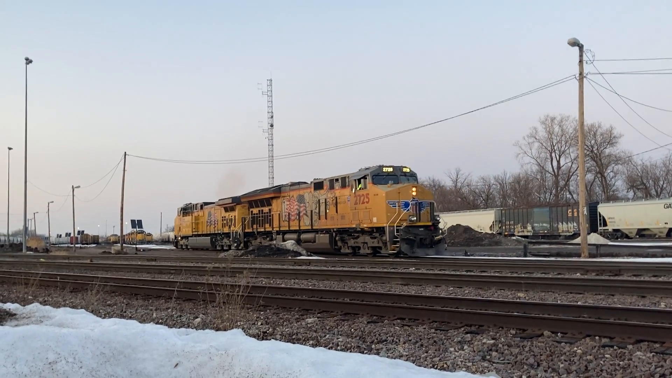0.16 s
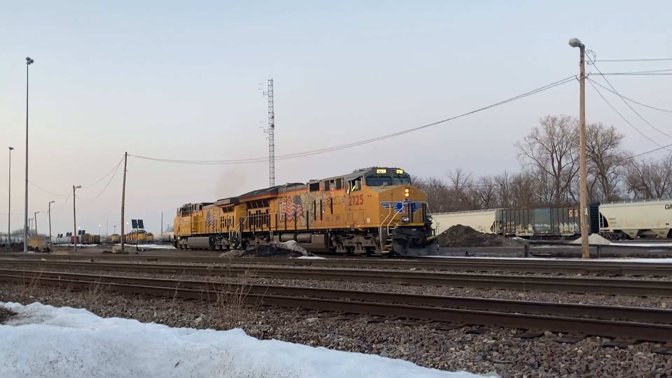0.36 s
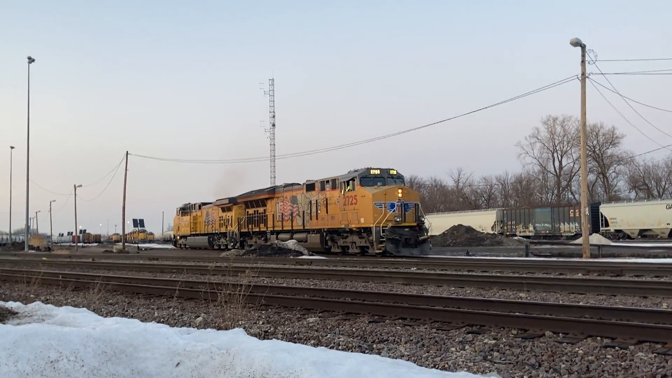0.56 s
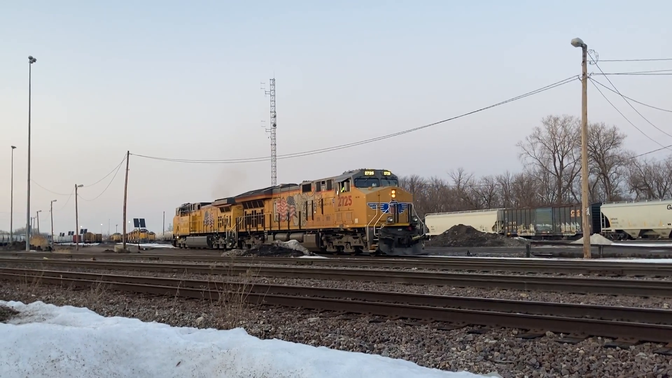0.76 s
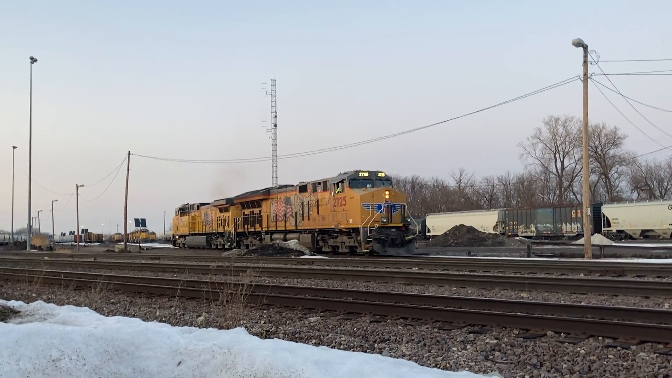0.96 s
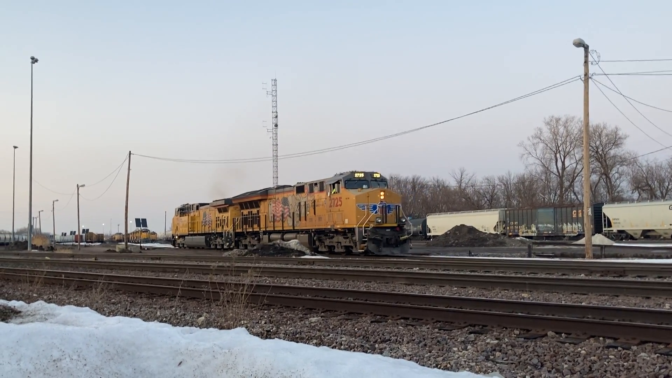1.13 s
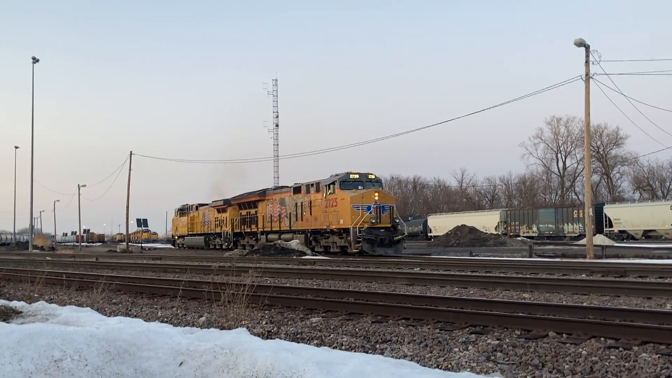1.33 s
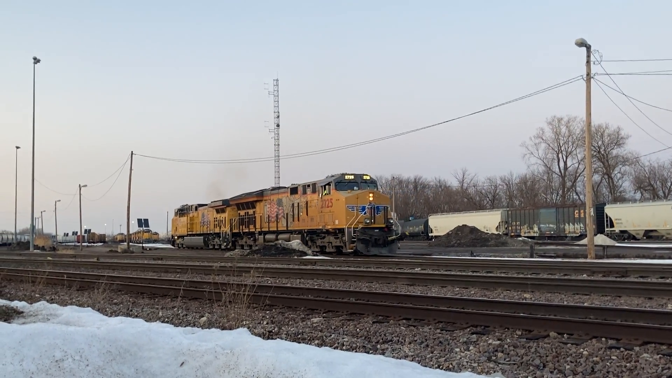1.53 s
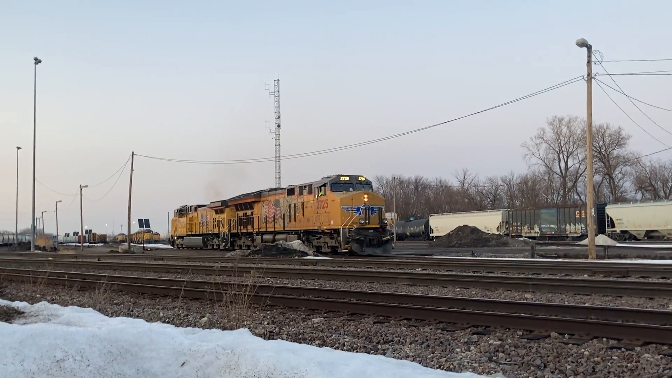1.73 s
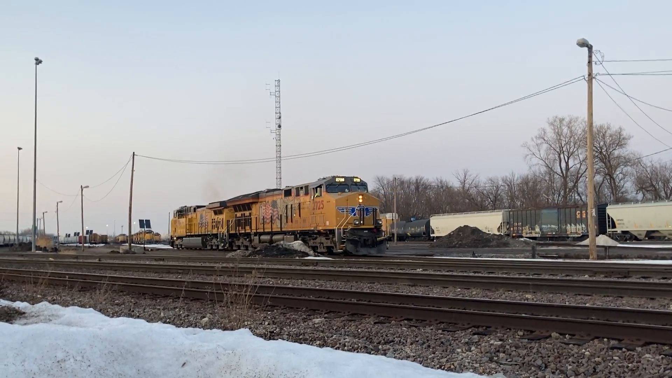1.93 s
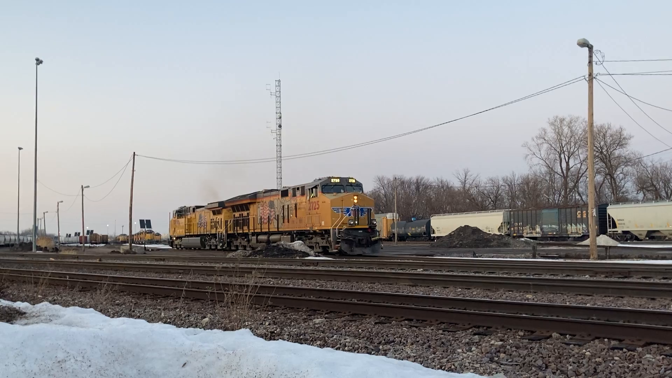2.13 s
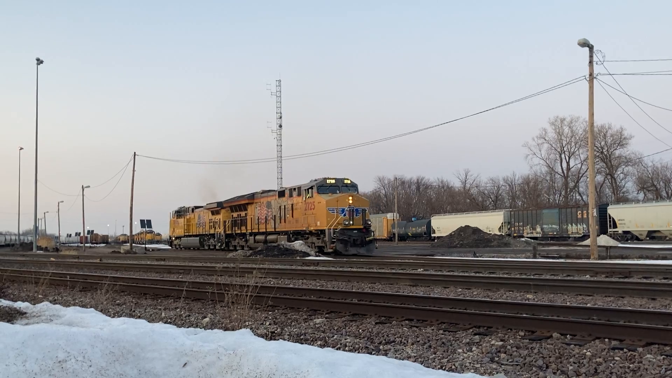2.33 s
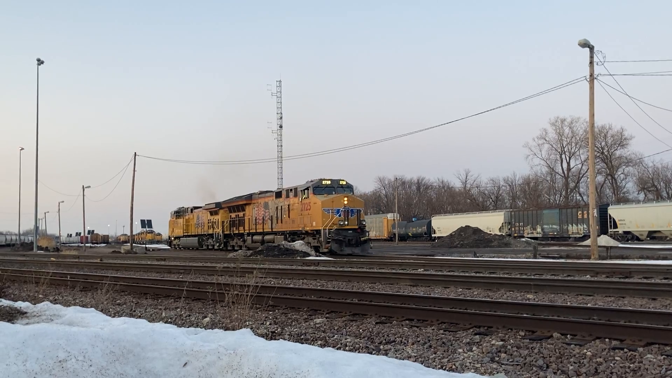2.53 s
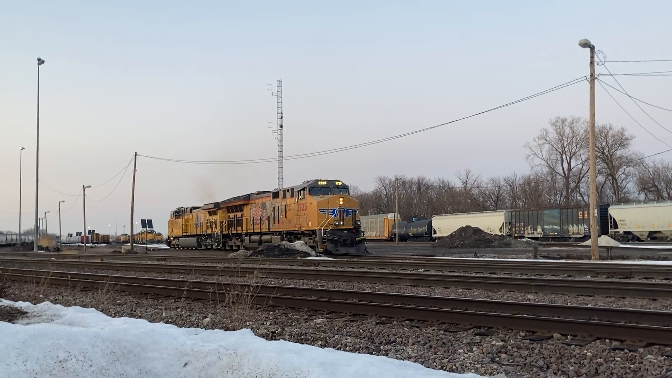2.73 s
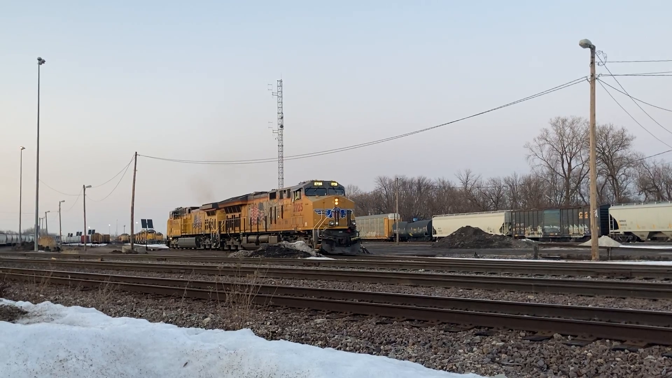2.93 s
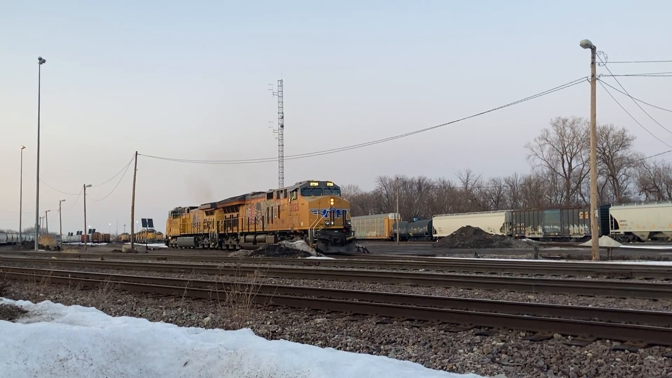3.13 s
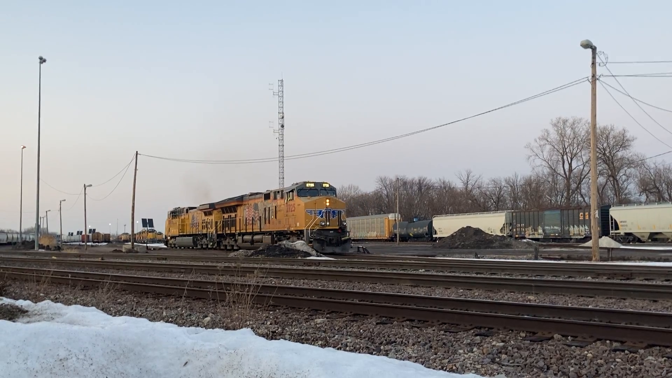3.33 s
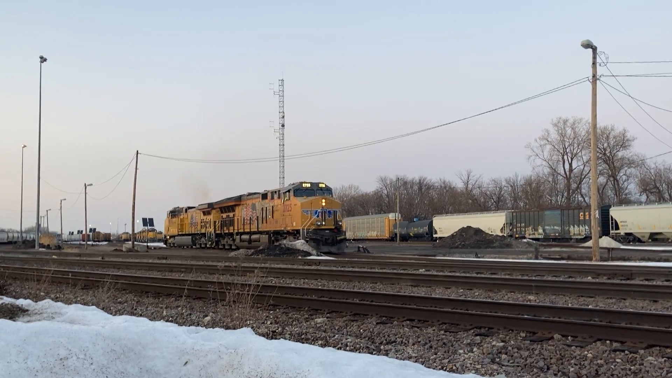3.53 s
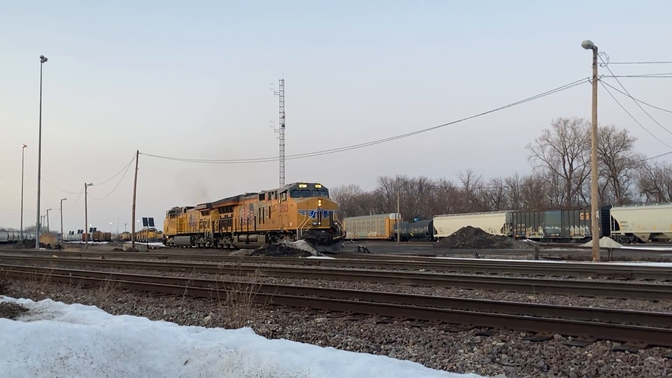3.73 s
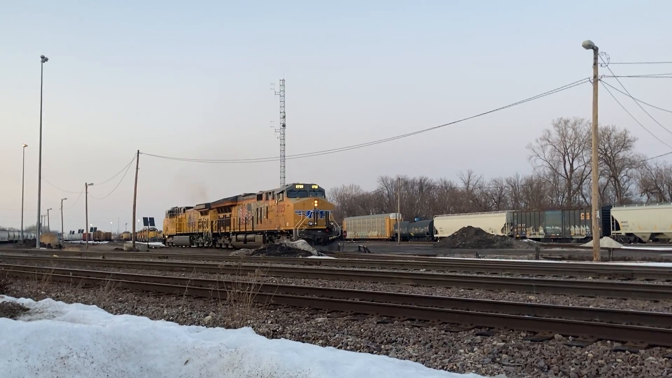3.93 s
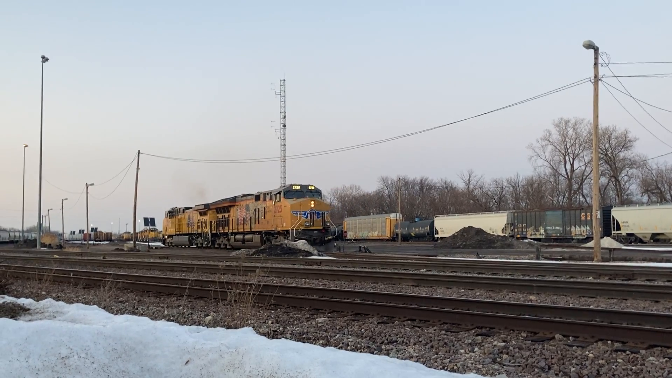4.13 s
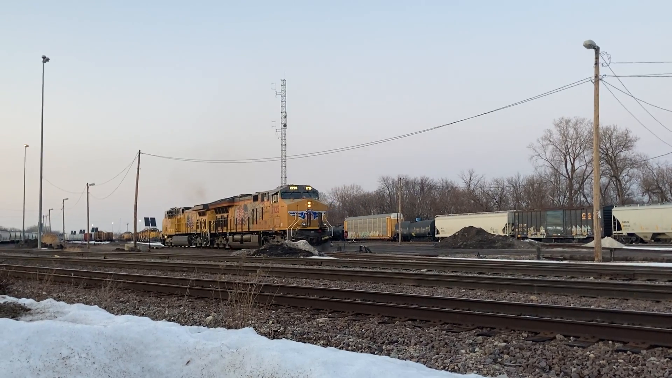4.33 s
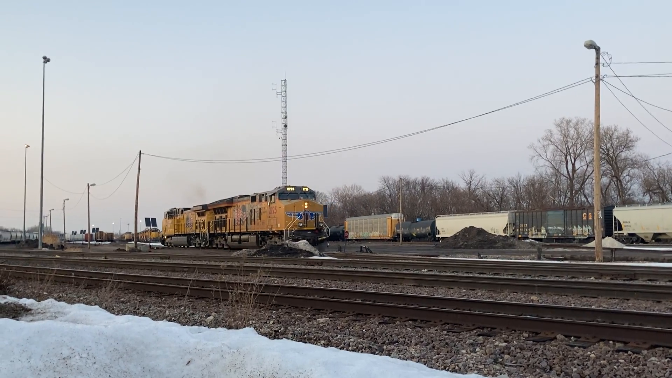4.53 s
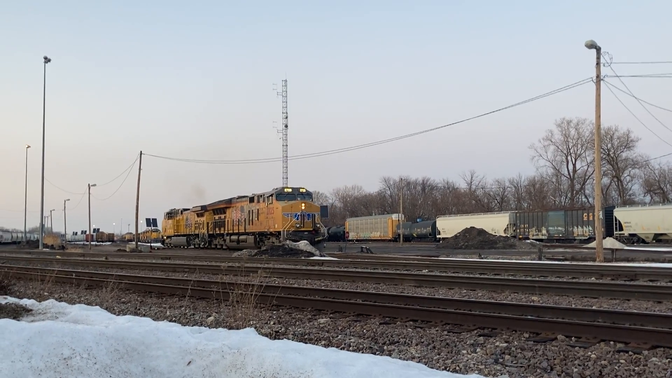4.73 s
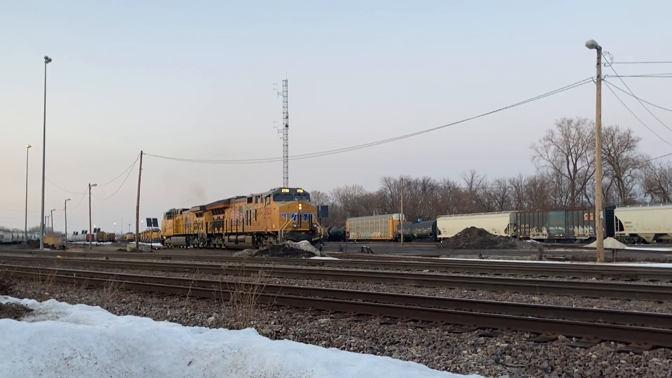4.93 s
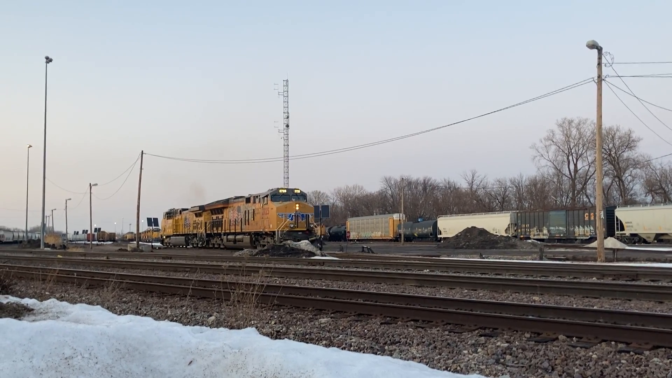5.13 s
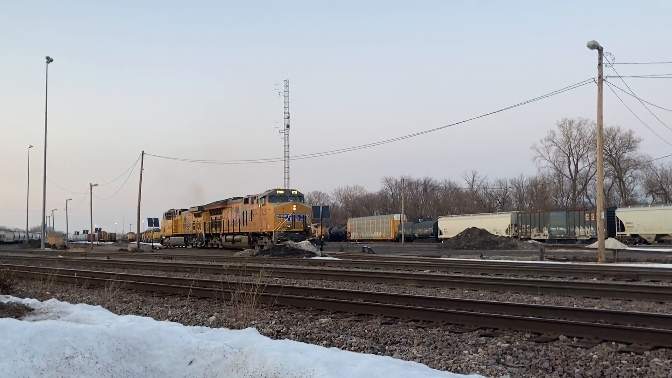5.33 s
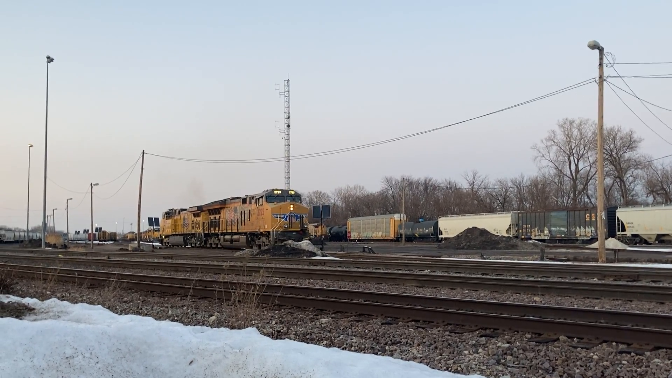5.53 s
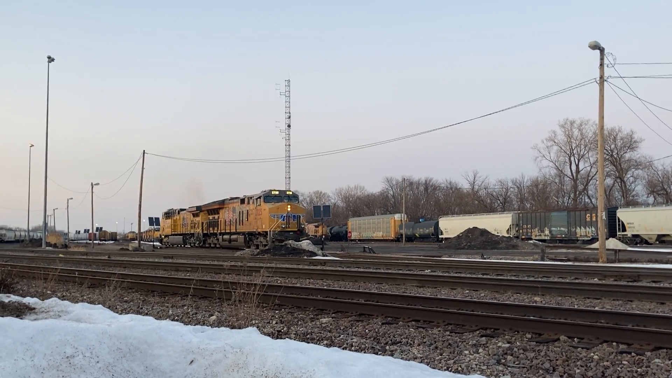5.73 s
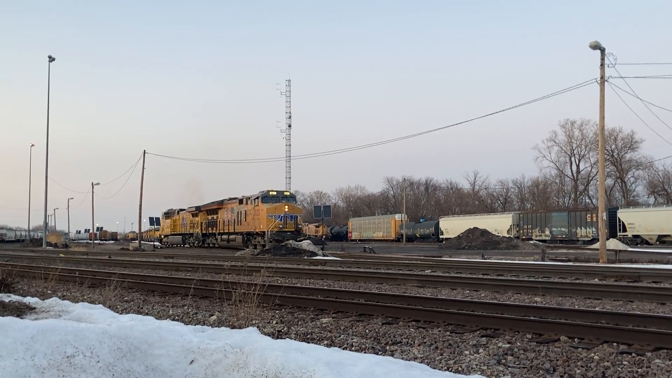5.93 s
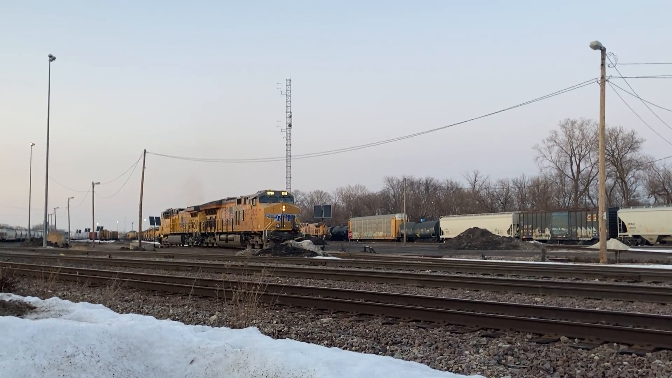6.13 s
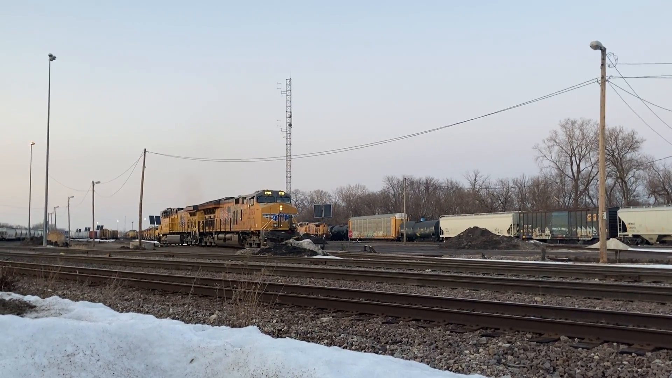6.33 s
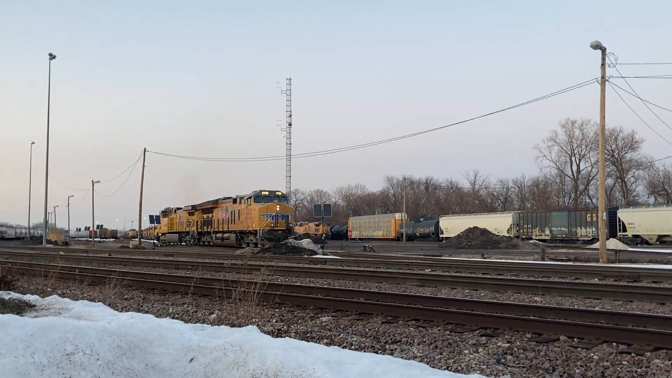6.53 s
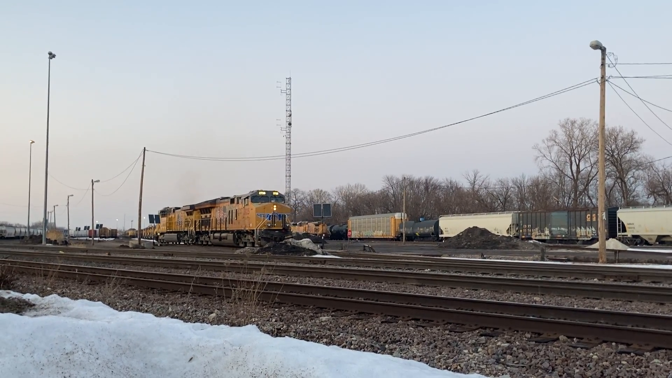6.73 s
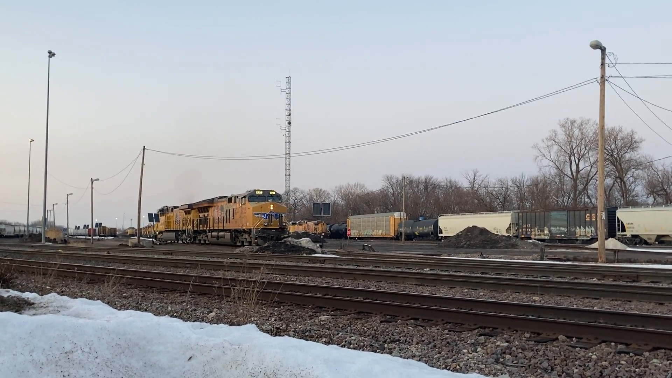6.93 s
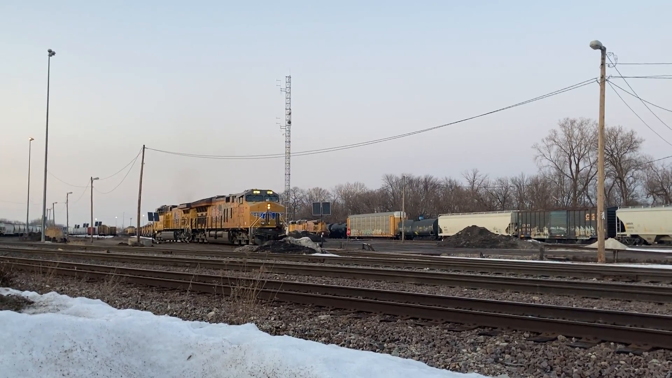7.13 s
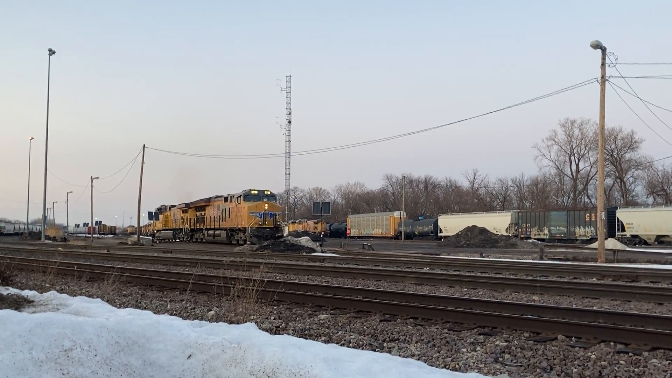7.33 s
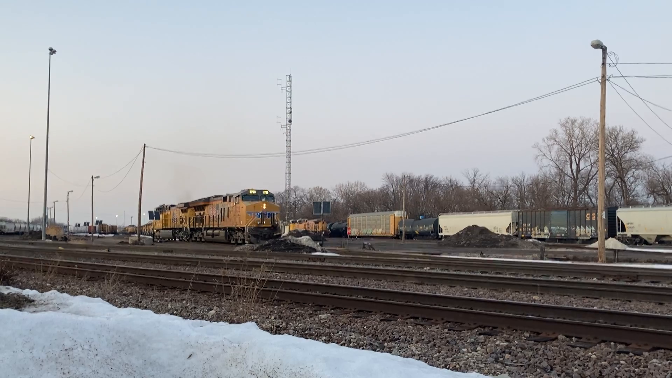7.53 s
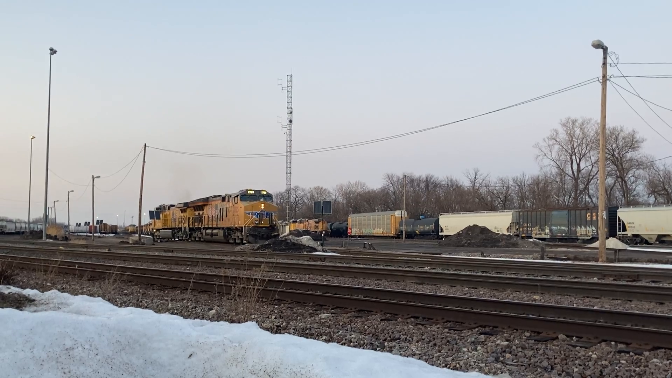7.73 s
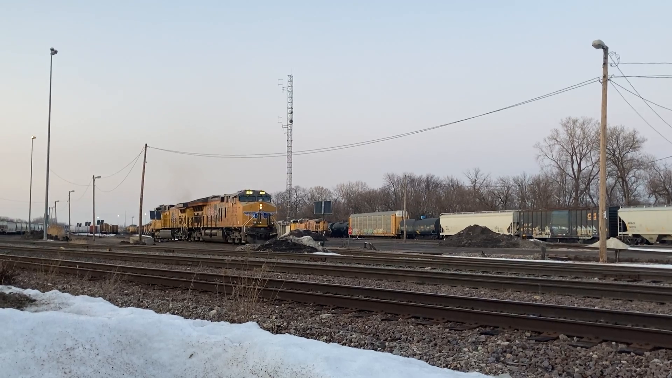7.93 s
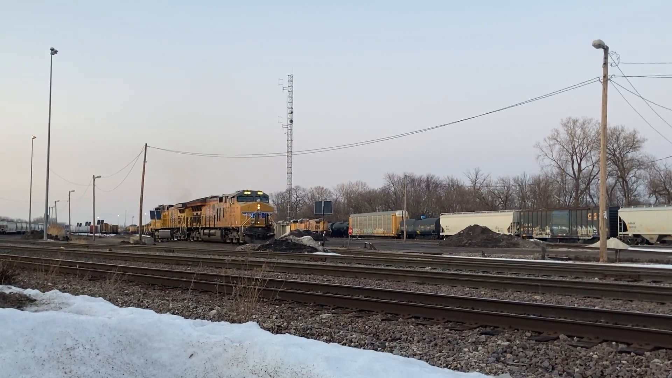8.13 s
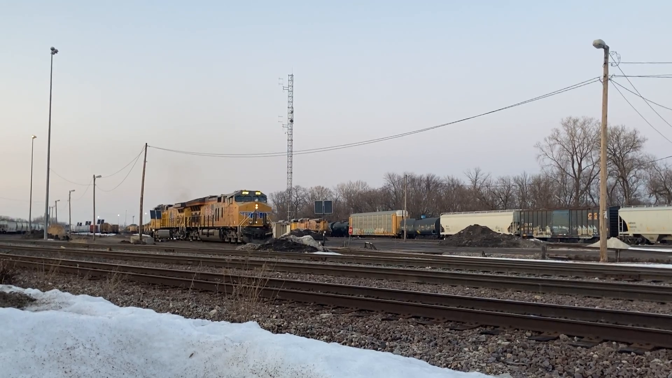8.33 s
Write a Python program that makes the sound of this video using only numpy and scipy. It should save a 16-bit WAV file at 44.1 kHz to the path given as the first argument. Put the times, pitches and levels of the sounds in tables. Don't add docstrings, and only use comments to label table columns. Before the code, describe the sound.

Two diesel locomotives back slowly away across an open rail yard, heard from the trackside on a stereo phone. Their deep exhaust throbs drift and beat together beneath a steady fan roar, thin electrical whine and airy hiss. Soft jolts, faint flange squeals and small metal clinks come irregularly. The upper sounds fade and dull with distance, while the low rumble persists to the end.

```python
import sys
import numpy as np
from scipy import signal
from scipy.io import wavfile
from scipy.ndimage import uniform_filter1d, map_coordinates

SR = 44100
rng = np.random.default_rng(int(sys.argv[2]) if len(sys.argv) > 2 else 0)


def gain_from_db(level_db):
    decades = np.asarray(level_db, float) / 20
    return 10 ** decades


def store_wav(level_fs):
    pcm = np.round(np.clip(np.atleast_2d(level_fs), -1, 1) * 32767)
    wavfile.write(sys.argv[1], SR, pcm.T.astype(np.int16))


N = 369116

# start, middle and end of the scene [t/s]
LEG_TIMES = [0, 4.2, 8.37]
SLOW = np.arange(0, N / SR + .01, .002)
# [t/s, level of the hiss band/dB]
PATH_LOSS = [(0, 0), (.6, 1.5), (1.4, -.5), (2.25, -.5), (2.7, -3), (3.5, -3), (3.95, -2.5), (4.7, -3.5),
             (5.6, -4), (6.0, -5), (6.5, -5.5), (7.4, -7), (8.37, -8.5)]

RUMBLE_COLOUR = [(20, -26), (30, -17), (45, -26), (60, -2.5), (75, 9), (90, 1.5), (110, -20), (135, -22)]
DRONE_COLOUR = [(80, -3.5), (110, -5.5), (140, 3), (180, -6), (250, -5), (350, -16)]
ROAR_COLOUR = [(300, -4.5), (400, -3), (500, -4.5), (620, -1.3), (780, -1.1), (1050, -0.54), (1350, -6.5),
               (1700, -8), (2100, -31)]
GEAR_COLOUR = [(1500, -8), (1800, 5), (2050, -2.5), (2400, 0.5), (2800, -3.5), (3300, -12), (3900, -6.5)]
HISS_COLOUR = [(3900, 0), (4400, 2), (5200, -3), (6000, -3.5), (6500, -3.5), (7500, -3), (9000, -8.5),
               (11500, -24.5)]
AIR_COLOUR = [(6000, -17), (7500, -0.5), (8500, 2), (11000, -1.5), (13000, -6.5), (14500, -10),
              (15200, -22)]
FLOOR_COLOUR = [(6000, -1), (10000, 2), (13000, -1.5), (15200, 1)]

# [level at start/dB, level at end/dB, cancel t/s, between cancels/s, echo share 0-1]
FRAME_DRONE = (-29, -35.5, 2, 9.5, 0.23)
# [t/s, swell level/dB, dying time/s]
COUPLER_SHOVES = [
    (.04, 3.5, 0.087),
    (3.3, 2, 0.12),
    (3.83, 4.5, 0.051),
    (4.25, 1, 0.09),
    (4.9, 4, 0.24),
    (5.93, 1, 0.04),
    (6.33, 4.5, .1),
    (6.7, 0, .08),
    (7.62, 5, 0.19),
]
# [t/s, swell level/dB, dying time/s]
RAIL_JOLTS = [(.18, 2.5, 0.048), (.36, 2.5, .08), (.64, 2.5, 0.037), (1.51, 2, .05), (1.96, 2.5, 0.073),
              (2.19, 1, .08), (2.33, -1, .05), (3.17, 1, .05), (3.76, 1.5, 0.11), (4.16, 4, 0.042),
              (4.96, 3, 0.097), (6.42, 2, 0.071), (7.05, 1, .06), (7.65, 1.5, .06)]

# [multiple of the firing cycle, polarity, levels at start, middle, end/dB]
REAR_WEAK = [(8, -1.1, -43, -55, -41), (8.73, 1, -35, -33, -37.5), (10, 0.76, -43, -32.5, -64),
             (12.15, 1, -39, -34, -33), (15.21, 1, -33, -44, -47), (19.5, 0.9, -45, -45, -40),
             (19.97, 0.91, -66, -44, -31), (24, 0.88, -53, -55, -50)]
FRONT_WEAK = [(7.9, 0.95, -53, -54, -42), (9.73, 0.75, -46, -36, -58), (11.07, 0.91, -42, -70, -59),
              (12, 1, -70, -87, -38), (13.3, 0.64, -34, -70, -67), (17, 0.29, -59, -56, -59),
              (17.51, 0.94, -35, -42, -40), (18.97, 1, -39.5, -32.5, -70), (20.02, -0.93, -51, -38, -34),
              (21.36, 0.95, -32, -55, -50), (22.27, 0.89, -42, -46, -39)]
# [multiple of the firing cycle, polarity, level at start/dB, level at end/dB]
REAR_STRONG = [(11, 1, -32, -30.5), (13, -1, -22.5, -29), (14, -1, -21.5, -32.5), (16, 1, -32, -28.5)]
FRONT_STRONG = [(9, 1, -38, -32), (14, 1, -21, -29), (15, 1, -13, -24), (16, 1, -25, -21)]
# [cancel t/s, between cancels/s, echo share 0-1]
REAR_WALL = [(1.1, 7.9, .9), (2.08, 3.8, 0.7), (4.25, 5.2, 0.3), (2, 3.9, 0.75)]
FRONT_WALL = [(1.05, 7.9, 0.96), (5.6, 6.3, 1), (1.32, 1.83, 0.22), (2.76, 3.0, .8)]

# [multiple of the shaft, levels at start, middle, end/dB]
WEAK_TEETH = [(1.01, -44, -51, -60), (4, -43, -52, -62), (6.996, -43.5, -59, -71), (9.09, -69, -47, -51),
              (10.08, -43.5, -50.5, -58), (10.93, -43.5, -70, -82), (11.87, -78, -57, -59),
              (14.03, -55, -67, -56), (14.86, -52, -57, -68), (24.2, -75, -71, -78)]
# [level at start/dB, level at end/dB, cancel t/s, between cancels/s, echo share 0-1]
STRONG_WHINE = [(-42, -48, 2.2, 5.3, .3), (-47.5, -45, 2.3, 3.6, 0.3), (-43.5, -50, 6.1, 10.6, 0.7),
                (-47, -41, 3.8, 4.03, 1)]
# [middle t/s, peak level/dB, half length/s]
WAGON_GAPS = [(.45, -51, 0.12), (1.028, -50, 0.065), (1.6, -50, 0.13), (1.95, -50, .17), (2.47, -48, 0.083),
              (2.818, -52, 0.12), (3.353, -50, 0.11), (3.748, -52, 0.068), (4.19, -50, 0.059),
              (4.963, -46, .07), (5.93, -53, 0.69), (7.032, -53, 0.1)]

# [t/s, swell level/dB, dying time/s]
FLANGE_SLIPS = [(.19, -1, .04), (.36, 13.5, .05), (.73, 10, .04), (1.15, 6, .05), (1.4, 2, .05),
                (2.05, 4, .05), (3.8, 7, 0.16), (4.0, 2, .04), (4.18, 11, .05), (4.45, 4, .08),
                (5.05, 7, .1), (5.23, 8, .05), (6.38, 13, .03)]
# two fan tones, and at 531 Hz the alternator's third multiple
FUZZY_TONES = [(624.4, 30, -44.5), (531, 14, -65), (461, 17, -55.5)]
# [t/s, peak level/dB, f/Hz]
LOOSE_PARTS = [(0.1994, -36, 4800), (0.3794, -33, 3760), (0.6344, -30, 4500), (1.9494, -28, 4450),
               (2.2194, -32, 3350), (3.7594, -38, 3200), (3.9494, -35, 4430), (4.1886, -22, 3520),
               (4.962, -32, 3300), (5.5394, -36, 3000), (7.079, -32, 4060), (7.2894, -38, 3140),
               (7.8594, -44, 4760), (7.9094, -36, 3040),
               (7.483, -35, 5800),
    (7.557, -33, 5600),
]

# [t/s, stretch of the port pattern, focus 0-1]
TRAIN_BEARING = [
    (0, 0.95, 0.46),
    (2.3, 0.96, 0.63),
    (3, 1.003, 1),
    (8.37, 1.035, 0.93),
]
# [f/Hz, level difference/dB, likeness 0-1, phase lead/rad]
PORT_PATTERN = [(60, -3.2, 0.98, -0.1), (170, -3.8, 0.9, 0.4), (450, 0.4, 0.76, 1.6), (600, 2.1, 0.85, 1.9),
                (750, 4.5, 0.42, 2.8), (950, -0.3, 0.55, 5.6), (1150, -2.5, 0.84, 6.3), (1350, 0.6, 0.63, 6.9),
                (1480, 0.7, 0.39, 7.6), (1650, 0.6, 0.64, 8.0), (1950, 1.4, 0.12, 7.9),
                (2200, -0.4, 0.69, 6.9), (2500, -2.0, 0.88, 7.2), (2750, -1.9, 0.47, 7.7),
                (2850, 0, .5, 10.1), (3000, .2, .76, 10.3), (3350, .5, .2, 9.4), (3650, .7, .9, 9.3),
             (4000, -1.4, .2, 10.6), (4400, .8, .64, 12.8), (4800, -4, .5, 14.4), (5200, -.3, .92, 15.6),
             (5600, -3.6, .75, 15.7), (5900, .2, .92, 15.7), (6180, -2, .85, 15.7), (6380, -4.7, .35, 18),
             (6650, 0, .95, 18.5), (7000, -.9, .92, 18.6),
                (7700, -.6, .9, 17.9), (8500, 0, .9, 16.5), (9200, 0, .97, 15.7), (10200, 0, .8, 14.2),
              (11200, 0, .97, 12.6), (12200, 0, .8, 12), (13200, 0, .97, 9.4), (14200, 0, .95, 9.2),
              (15200, 0, .95, 6.3)]
# [f/Hz, level/dB]
BODY_RIPPLES = [(2100, -3.5), (2400, 3), (2720, -3), (3000, 3.5), (3380, 4.5), (3680, 1.5), (3900, -3),
                (4350, 2.6), (4650, 0), (4900, 4.5), (5300, 1), (5800, 3), (6100, 0), (6450, 1)]


def unit(x):
    return x / np.sqrt(np.mean(x ** 2) + 1e-20)


def curves(rows):
    s, *cols = np.transpose(rows)
    return [np.interp(np.arange(N) / SR, s, c) for c in cols]


def legs(values):
    return np.interp(np.arange(N) / SR, LEG_TIMES, values)


def full(slow):
    return np.interp(np.arange(N) / SR, SLOW, slow)


def wobble(rate):
    knots = rng.standard_normal(int(N * rate / SR) + 4)
    return map_coordinates(knots, [np.arange(N) * rate / SR])


def swells(rows, rise_s):
    total = 0
    for s, db, die_s in rows:
        rise = np.clip((SLOW - s) / rise_s + 1, 0, 1)
        total = total + db * rise * np.exp(-np.clip(SLOW - s, 0, None) / die_s)
    return full(total)


def echoed(start_db, end_db, cancel_s, period_s, share):
    share = np.clip(share, 0, .95)
    echo = share * np.exp(2j * np.pi * (SLOW - cancel_s) / period_s)
    both = np.abs(1 - echo) / (1 + share)
    drift_db = start_db + (end_db - start_db) * SLOW * SR / N
    return full(drift_db + 20 * np.log10(both))


def rush(spectrum, patchy_db):
    hz, _, z = signal.stft(rng.standard_normal((2, N)), SR, nperseg=2048)
    field = uniform_filter1d(rng.standard_normal(z.shape[1:]), size=20, axis=0)
    field = uniform_filter1d(field, size=3, axis=1)
    f, db = np.transpose(spectrum)
    colour = np.interp(np.log(hz + 1), np.log(f), db, left=-120, right=-120)[:, None]
    noise = signal.istft(z * gain_from_db(colour + patchy_db * unit(field)), SR, nperseg=2048)[1]
    return unit(noise[:, :N])


def narrow(hz, width_hz):
    phase = 2 * np.pi * np.cumsum(hz * np.ones(N)) / SR
    return unit(wobble(width_hz) * np.sin(phase) + wobble(width_hz) * np.cos(phase))


def rumble():
    return gain_from_db(legs([-28, -30, -30.5])) * rush(RUMBLE_COLOUR, patchy_db=2.5)


def frame_drone():
    db = echoed(*FRAME_DRONE) + swells(COUPLER_SHOVES, rise_s=0.025) + 0.27 * wobble(2.45)
    return gain_from_db(db) * rush(DRONE_COLOUR, patchy_db=1.5)


def fans_and_gears(loss_db, jolt_db):
    roar_db = -32 + 0.58 * loss_db + 0.35 * jolt_db
    fans = gain_from_db(roar_db + 1.3 + 0.1 * wobble(9)) * rush(ROAR_COLOUR, patchy_db=1.58)
    fading_db = legs([-7, -8, -9.5])
    gears = gain_from_db(roar_db + fading_db + .5 * wobble(9.4)) * rush(GEAR_COLOUR, patchy_db=1.16)
    return fans + gears


def hiss_and_air(loss_db, jolt_db):
    chuff = wobble(14)
    hiss_db = -48.5 + loss_db + jolt_db + 0.75 + 0.25 * chuff
    hiss = gain_from_db(hiss_db) * rush(HISS_COLOUR, patchy_db=1.3)
    air_db = -59 + 1.82 * loss_db + 2.4 * jolt_db + 4.5 + 0.64 * chuff + 1.0 * wobble(9.8)
    return hiss + gain_from_db(air_db) * rush(AIR_COLOUR, patchy_db=2.5)


def exhaust(weak, strong, walls, cycle_hz, fire_s, turn, shade_db=0):
    t = np.arange(N) / SR
    crank = 2 * np.pi * cycle_hz * (t - fire_s) + turn
    orders = [(round(k), np.sign(sign), legs(db)) for k, sign, *db in weak]
    for (k, sign, *db), wall in zip(strong, walls):
        orders.append((round(k), np.sign(sign), echoed(*db, *wall) + shade_db))
    out = np.zeros(N)
    for k, sign, db in orders:
        size = gain_from_db(db + .7 * wobble(2))
        out += sign * size * np.cos(k * (crank - turn) + turn + .15 * wobble(2))
    return out


def alternator():
    t = np.arange(N) / SR
    shaft = 2 * np.pi * 177.23 * t + .03 * wobble(3)
    *strong_db, blower_db = [echoed(*row) + 1.8 * wobble(3) for row in STRONG_WHINE]
    glint = gain_from_db(-62.5)
    for s, db, half_s in WAGON_GAPS:
        glint = glint + gain_from_db(db) * np.exp(-((SLOW - s) / half_s) ** 4)
    strong_db.append(full(20 * np.log10(glint)))
    tones = [(round(k), legs(db) + 2.5 * wobble(1.7)) for k, *db in WEAK_TEETH]
    tones += [(k, db + 1.5 * wobble(4)) for k, db in zip((5, 6, 8, 13), strong_db)]
    out = np.sqrt(2) * gain_from_db(blower_db) * np.sin(2 * np.pi * 1016 * t + 1.47 * wobble(7))
    for k, db in tones:
        out += np.sqrt(2) * gain_from_db(db) * np.sin(k * shaft + rng.uniform(0, 2 * np.pi))
    return gain_from_db(0.5) * out


def flange(loss_db):
    db = -59 + loss_db + swells(FLANGE_SLIPS, rise_s=0.024) + 1.2 * wobble(8.8)
    return gain_from_db(db + 0.5) * narrow(6630 + 35 * wobble(4), width_hz=130)


def fuzzy_tones():
    return sum(gain_from_db(db) * narrow(hz, width_hz) for hz, width_hz, db in FUZZY_TONES)


def clinks():
    out, t = np.zeros(N + SR), np.arange(3000) / SR
    for s, db, hz in LOOSE_PARTS:
        blur = uniform_filter1d(rng.standard_normal(len(t)), size=12)
        blur = uniform_filter1d(blur, size=12)
        body = np.sin(2 * np.pi * hz * t) * (.5 + .9 * unit(blur))
        fall = gain_from_db(db - 8 - 60 * t / .07)
        out[round(s * SR):][:len(t)] += fall * (1 - np.exp(-t / .0015)) * body
    return out[:N]


def scene():
    loss_db = curves(PATH_LOSS)[0]
    jolt_db = swells(RAIL_JOLTS, rise_s=0.019)
    field = rumble() + frame_drone()
    field += fans_and_gears(loss_db, jolt_db) + hiss_and_air(loss_db, jolt_db)
    tones = exhaust(REAR_WEAK, REAR_STRONG, REAR_WALL, cycle_hz=4.79, fire_s=.0259, turn=0)
    tones += exhaust(FRONT_WEAK, FRONT_STRONG, FRONT_WALL, cycle_hz=5.3705, fire_s=.0195,
                     turn=-np.pi / 2, shade_db=0.95 * loss_db)
    tones += alternator() + flange(loss_db) + fuzzy_tones() + clinks()
    field[0] += tones
    return field


def ports(field):
    edge = 2048
    padded = np.pad(field, ((0, 0), (edge, edge)), "reflect", reflect_type="odd")
    hz, t, (aimed, spread) = signal.stft(padded, SR, nperseg=1024)
    t = t - edge / SR
    hz = hz[:, None]
    s, stretch, focus = np.transpose(TRAIN_BEARING)
    stretch = np.interp(t, s, stretch) - 1
    seen_hz = hz * (1 + stretch * np.clip((7600 - hz) / 900, 0, 1))
    f, *cols = np.transpose(PORT_PATTERN)
    pan_db, alike, lead = (np.interp(seen_hz, f, c) for c in cols)
    depth = np.interp(t, LEG_TIMES, [.75, 1.05, 1.5])
    ripple_db = np.interp(seen_hz, *np.transpose(BODY_RIPPLES), left=0, right=0)
    gain = gain_from_db(ripple_db * depth) * (seen_hz < 15250)
    wide = (seen_hz > 2800) & (seen_hz < 7000)
    alike = alike * np.where(wide, np.interp(t, s, focus), 1)
    turn = np.arccos(np.clip(alike, 0, 1)) / 2
    same, apart = np.cos(turn) * aimed, np.sin(turn) * spread
    skew = gain_from_db(pan_db / 2) * np.exp(.5j * lead)
    pair = gain * np.array([(same + apart) * skew, (same - apart) / skew])
    return signal.istft(pair, SR, nperseg=1024)[1][:, edge:edge + N]


def roll_off(x):
    return signal.sosfilt(signal.butter(12, 16920, fs=SR, output="sos"), x)


def record(dry):
    heard = ports(dry + gain_from_db(-76) * rush(FLOOR_COLOUR, patchy_db=.5))
    close = np.sin(np.pi / 2 * np.clip((N - np.arange(N)) / (.012 * SR), 0, 1))
    return roll_off(heard * close)


dry = scene()
out = record(dry)
store_wav(out)
```